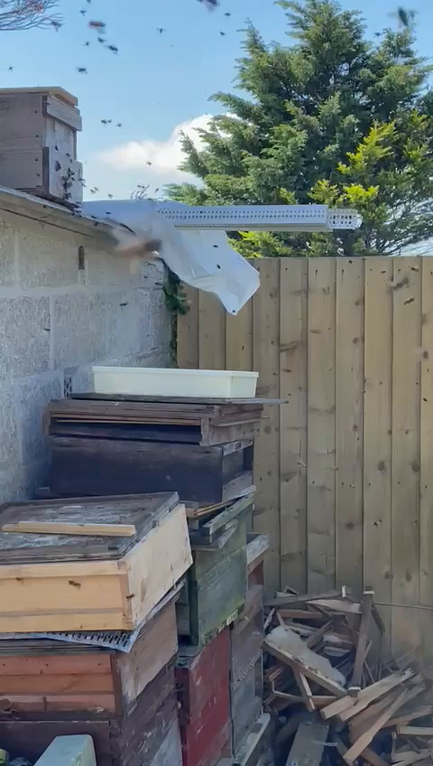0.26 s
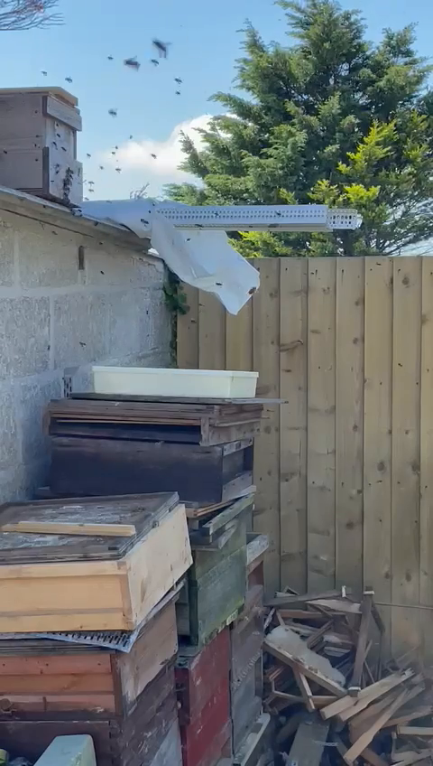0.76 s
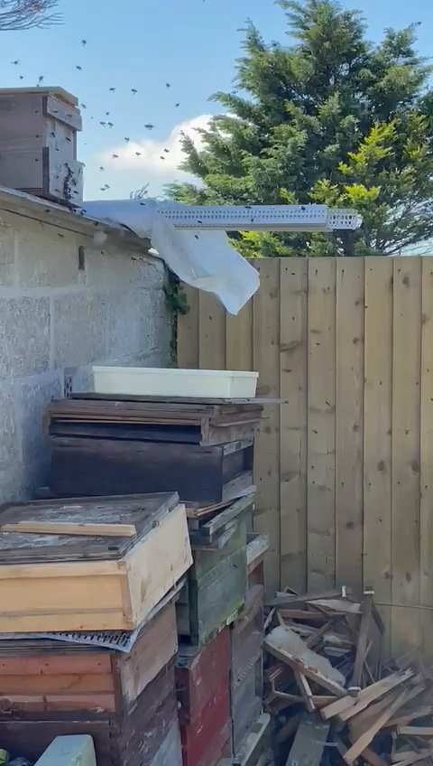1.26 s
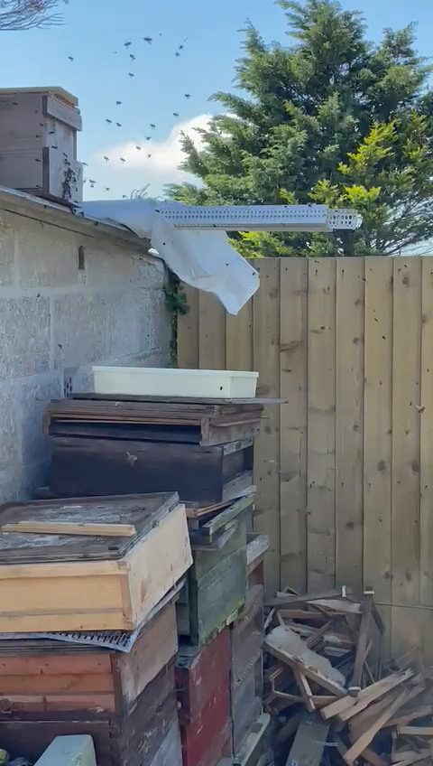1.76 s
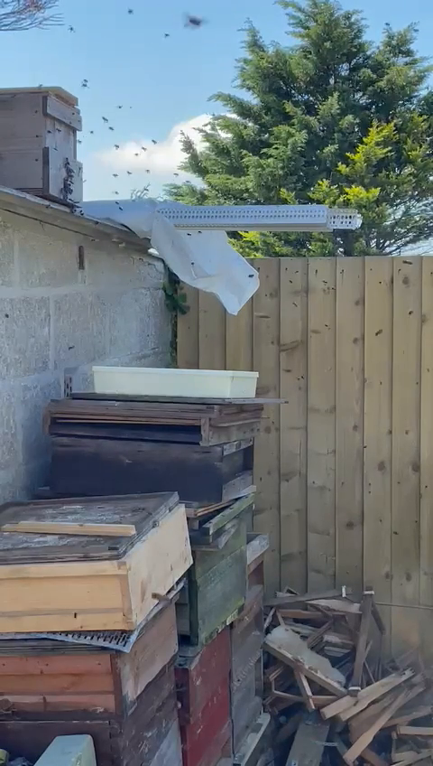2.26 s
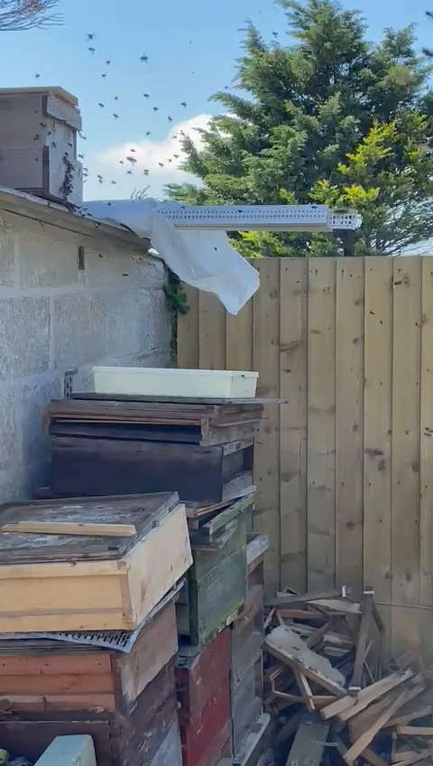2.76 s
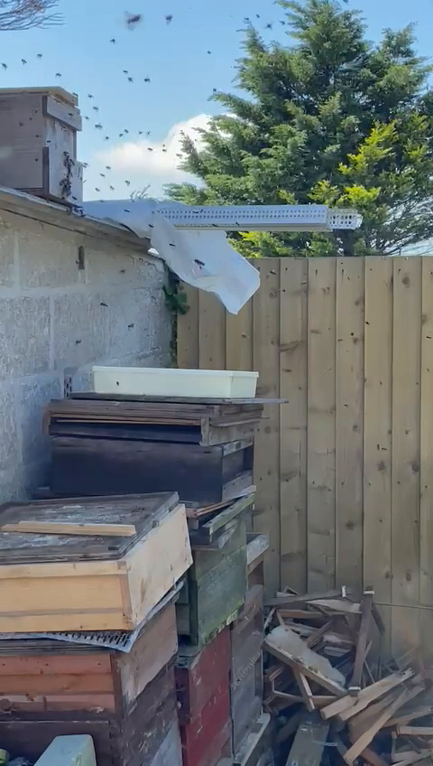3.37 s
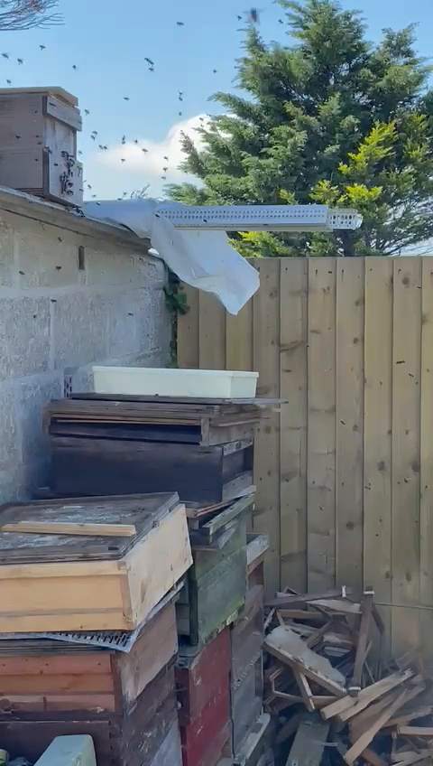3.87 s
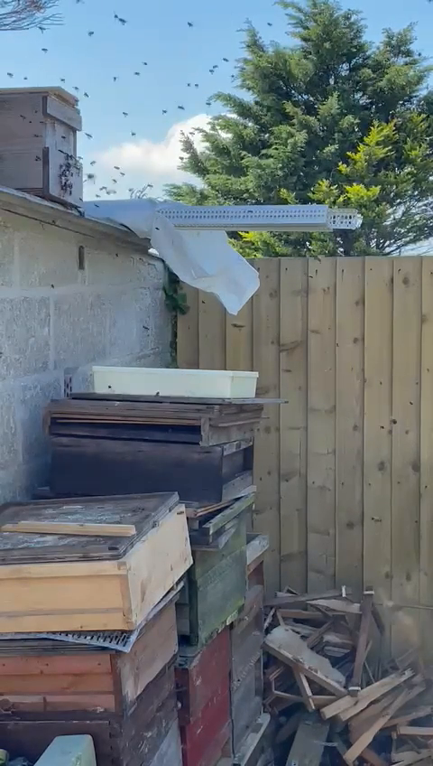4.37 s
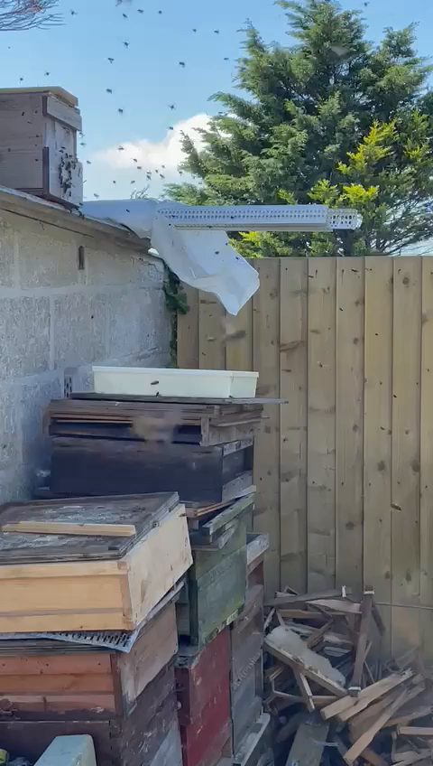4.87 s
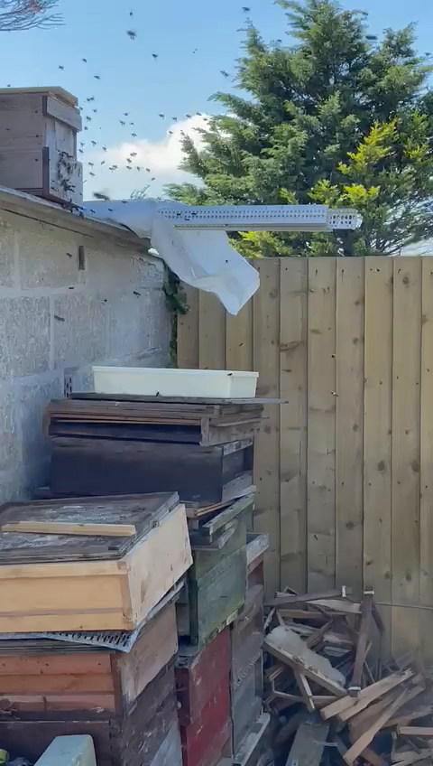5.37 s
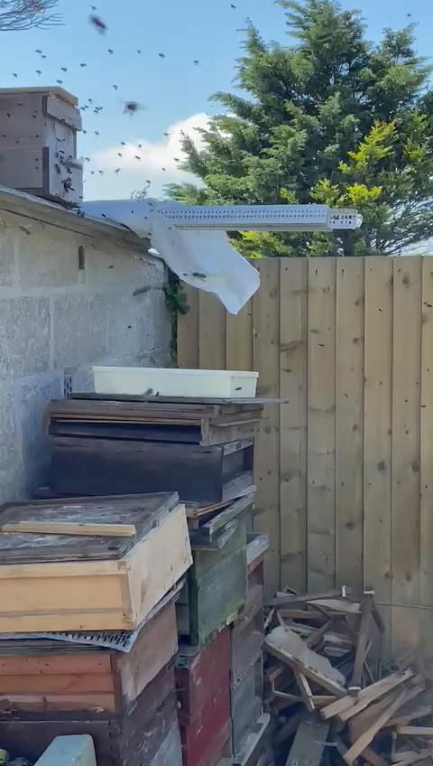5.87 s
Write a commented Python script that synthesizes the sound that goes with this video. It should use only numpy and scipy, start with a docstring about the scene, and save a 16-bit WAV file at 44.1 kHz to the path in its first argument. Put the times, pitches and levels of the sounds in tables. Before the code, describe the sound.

A dense swarm of bees hums steadily over backyard hives, single bees zipping close by, with faint sparrow chirps and low traffic rumble.

```python
"""A walled yard with hives, in stereo: a swarm of bees hangs over them, and single bees pass close by.
The swarm is many repeated wing strokes of slightly different, drifting pitch, with a wing hiss.
Further off a sparrow chirps three times, then gives one faint note: rattling whistles smeared by echoes.
Unseen traffic drones in the background: slowly gliding low tones over a rumble of shaped noise."""
import sys
import numpy as np
from scipy import signal
from scipy.fft import rfft, irfft, next_fast_len
from scipy.io import wavfile
from scipy.ndimage import uniform_filter1d

SR = 44100
rng = np.random.default_rng(int(sys.argv[2]) if len(sys.argv) > 2 else 0)


def transcribe(signal):
    """Save signal, clipped to [-1, 1], as a 16-bit WAV file at the path in sys.argv[1]."""
    frames = np.atleast_2d(signal).T
    limited = np.clip(frames, -1, 1)
    pcm = np.round(limited * 32767).astype(np.int16)
    wavfile.write(sys.argv[1], SR, pcm)


N = 269451  # length of the scene [samples]

# Loudness of the whole swarm in the middle, without its hiss: (time [s], level [dB])
SWARM_LEVEL = [(0, -44), (0.499, -45), (0.998, -45), (1.5, -44.5), (1.901, -45.5), (2.4, -44.5),
               (2.9, -44.5), (3.302, -44.5), (3.8, -44.5), (4.3, -44), (4.8, -44), (5.3, -44.5),
               (5.799, -44.5), (6.11, -44)]
# How pitch and nearness are shared out; slow and very fast beats are fainter and mostly duller:
# (share of bees below [0-1], pitch [Hz], relative level [dB], lift of overtones from the fourth up [dB])
BEE_PITCHES = [(0, 174.3, -8.5, -5), (.15, 202.4, -2.5, -3.5), (.3, 223.8, 1, -2), (.55, 241.4, 1.45, -0.3),
               (.75, 251.5, 1.5, 2), (.9, 259.6, -1.5, 0), (1.001, 277.3, -4, 0.5)]
# Relative strength of the tones in one wing beat: (overtone number [1 = the beat itself], level [dB])
WING_OVERTONES = [(1, 3), (2, 4.5), (3, -5.5), (4, -5.5), (5, -5), (6, -9), (8, -16.5), (11, -19.5),
                  (16, -21.5), (26, -26.5)]
# Colour of the wing hiss: (frequency [Hz], relative level per Hz [dB])
HISS_COLOUR = [(250, -25), (600, -11.5), (1200, -1.5), (2500, -14.5), (4500, -20), (6300, -23.5),
               (9000, -20), (10500, -18), (12000, -26)]
# Bees that pass close; a negative half fall is a rise: (time of the middle of the pass [s],
# half the crossing time [s], middle pitch [Hz], half the fall in pitch [Hz], peak level [dB],
# lift of overtones 5 to 7 [dB])
CLOSE_PASSES = [(0.2, .1, 249.6, 7.5, -55.5, -4), (0.82, .1, 237.6, 13.5, -47, 3),
                (0.98, .12, 246.4, 4, -49, 2), (1.1, .12, 247.4, 6.5, -47, -10),
                (1.399, .12, 232, 6, -50, 3), (1.5, .1, 244.5, 9, -56, 3), (2.2, .08, 244.7, 4, -56, -5),
                (2.4, .12, 247, -10, -54, 9), (2.701, .08, 238.5, 9, -45, -6),
                (2.8, .15, 233, 3, -52.5, -2), (3.279, .1, 243.5, 4.5, -53.5, -8),
                (3.51, .15, 252, 6, -49, -6), (4.189, .12, 239.2, 8, -49.5, 9),
                (4.4, .1, 249.4, 7.5, -44.5, 1), (4.572, .055, 255, 3.5, -47.5, 16.5),
                (4.661, .1, 244.2, 12.5, -47.5, -7), (4.92, .12, 226, 8, -41.5, 1.5),
                (5.0, 0.088, 206.9, 8, -50, -4), (5.21, .13, 261, -11, -44, 1),
                (6.009, .13, 246, 5.5, -48, 5)]
# Notes of the sparrow's three chirps and one faint far note: (time [s], length [s], first pitch [Hz],
# last pitch [Hz], level before the swell [dB], depth of the pitch rattle [Hz])
CHIRP_NOTES = [(2.232, 0.06, 5910, 6270, -64, 380), (2.266, 0.049, 4270, 4666, -50, 180),
               (2.277, 0.07, 3550, 3450, -58, 260), (2.306, 0.021, 4160, 4280, -50, 250),
               (2.32, 0.054, 3800, 3824, -47, 250), (2.345, 0.031, 4270, 4180, -53, 110),
               (2.356, 0.039, 3700, 3550, -60, 280), (3.362, 0.03, 3750, 3850, -59, 150),
               (3.373, .075, 4700, 4570, -53.5, 250), (3.374, 0.07, 5120, 5050, -60, 178),
               (3.43, 0.025, 4500, 4160, -52, 260), (3.437, 0.038, 3390, 3170, -56, 250),
               (3.463, 0.031, 3300, 3420, -57, 250), (4.215, 0.05, 5550, 5410, -59.5, 400),
               (4.242, .045, 4450, 4880, -53, 130), (4.24, .055, 3430, 3610, -59, 240),
               (4.243, .035, 4040, 4120, -55, 150), (4.265, 0.054, 4030, 4010, -46.5, 190),
               (4.297, 0.042, 3780, 3770, -47, 290), (4.327, 0.038, 3700, 3590, -59, 358),
               (4.367, 0.037, 3700, 3750, -65, 340), (4.765, 0.041, 5070, 5320, -67, 10)]
# The three strongest engine tones, one curve each: (time [s], pitch [Hz], level [dB])
STRONG_ENGINES = [
    [(0.0, 51.2, -44), (0.45, 50, -46.5), (0.6, 51.9, -27), (0.85, 51.7, -23), (0.94, 50.84, -21),
     (1.2, 50.5, -25.5), (1.5, 52.1, -26.5), (1.75, 49.27, -26.5), (2.05, 49.7, -33), (2.2, 47.5, -43),
     (2.35, 50.9, -46)],
    [(3.45, 51.7, -37), (3.62, 51.7, -34), (3.94, 51.5, -29.5), (4.21, 50.2, -32), (4.48, 51.1, -33.5),
     (4.76, 51.74, -37.5), (5.03, 51.83, -28.5), (5.3, 53.4, -31), (5.57, 55.1, -33.5), (5.84, 56.8, -31),
     (6.11, 57.3, -37)],
    [(3.15, 75.4, -51), (3.3, 74.4, -51), (3.47, 77.4, -35), (3.6, 78, -43), (3.72, 79.3, -41),
     (3.85, 74.53, -52), (3.98, 69.5, -38.5), (4.15, 59.57, -39), (4.35, 55.16, -31), (4.61, 57.3, -37),
     (4.86, 55.67, -40), (5.11, 57.82, -40.5), (5.36, 59.2, -30.5), (5.61, 59.8, -33), (6.11, 63.2, -56)],
]
# Weaker engine tones that swell and dip, one curve each: (time [s], pitch [Hz], level [dB])
WEAK_ENGINES = [
    [(0.0, 65.6, -39.5), (0.19, 67.9, -41.5), (0.38, 66.7, -36), (0.56, 66.6, -38), (0.75, 67, -39),
     (0.94, 67.8, -46), (1.12, 67.2, -47), (1.31, 66.6, -43.1), (1.5, 65.6, -51.4)],
    [(0.0, 87, -53.0), (0.2, 88.3, -48.8), (0.39, 88.9, -51), (0.58, 88.2, -46.5), (0.78, 87.2, -48.5),
     (0.98, 88.1, -42), (1.17, 86.6, -52), (1.36, 88.2, -44), (1.56, 85.7, -52), (1.76, 87.2, -51),
     (1.95, 87.5, -54)],
    [(0.7, 95, -59), (0.91, 97.0, -55.5), (1.12, 98.0, -58), (1.34, 99.4, -53), (1.55, 99.9, -61.4)],
    [(1.6, 68.8, -51.1), (1.79, 70.1, -39.5), (1.99, 69.2, -40.5), (2.18, 70.8, -42.5), (2.37, 70.4, -49),
     (2.56, 72.4, -48.9), (2.76, 70.4, -52), (2.95, 74.37, -60)],
    [(1.95, 61.1, -55), (2.14, 59.9, -47), (2.34, 60.5, -42), (2.53, 60.5, -39.5), (2.73, 60.7, -41),
     (2.92, 60.2, -41.5), (3.12, 60.3, -43.5), (3.31, 61.4, -39), (3.51, 60, -39), (3.7, 60.5, -52.6)],
    [(1.9, 81.6, -57), (2.1, 81.6, -52), (2.3, 81.08, -44), (2.5, 80.7, -47.5), (2.7, 80.2, -45),
     (2.9, 81.1, -46.3), (3.1, 79.6, -47), (3.3, 78.2, -49)],
    [(2.1, 42.4, -56.3), (2.29, 41.8, -54.2), (2.48, 39.5, -61), (2.66, 39.7, -52), (2.85, 41, -50),
     (3.04, 40.4, -52), (3.22, 41, -52), (3.41, 40.46, -51), (3.6, 41.1, -53.6)],
    [(2.3, 50.7, -52), (2.49, 50.5, -46.2), (2.68, 49.2, -51), (2.88, 49.74, -50), (3.07, 50.3, -48),
     (3.26, 50.34, -51), (3.45, 51.25, -47)],
    [(2.45, 96, -55), (2.65, 97, -52.7), (2.85, 99, -49), (3.05, 100.8, -59.2), (3.25, 102, -58.5),
     (3.45, 102.5, -65)],
    [(3.65, 87.6, -53.7), (3.84, 88.5, -46), (4.04, 88, -45), (4.23, 88.2, -46), (4.43, 87.9, -47),
     (4.62, 87, -49), (4.82, 86.4, -43.5), (5.01, 86.9, -46), (5.21, 85.9, -48), (5.4, 85.5, -51)],
    [(5.4, 87.6, -55), (5.63, 87.4, -55.8), (5.87, 91, -47), (6.11, 89.4, -51)],
    [(3.8, 97.9, -52), (4.0, 98.5, -53), (4.2, 101.5, -54.0), (4.4, 101.2, -65)],
    [(3.6, 65.3, -51.6), (3.79, 68.3, -49), (3.97, 69, -47), (4.16, 67.8, -59), (4.34, 68, -55),
     (4.53, 68, -45), (4.71, 66.8, -48.2), (4.9, 66.0, -51.5)],
    [(4.9, 71.5, -48), (5.1, 69.7, -53), (5.3, 69.93, -42), (5.5, 70, -53)],
    [(4.0, 111, -62), (4.21, 114, -62.8), (4.42, 112, -57.1), (4.63, 113, -68), (4.84, 115.4, -54.5),
     (5.05, 115.1, -57), (5.26, 117.5, -53), (5.47, 119.4, -53.5), (5.68, 120.7, -58), (5.89, 121.6, -56.2),
     (6.11, 123.7, -56)],
    [(4.9, 106.6, -63), (5.1, 107.2, -62), (5.3, 107, -53), (5.5, 109.3, -68)],
    [(5.3, 80.9, -61), (5.5, 79.9, -51), (5.7, 81.93, -52.8), (5.9, 81.7, -45), (6.11, 85, -49.1)],
    [(5.75, 71.6, -55.0), (5.92, 70.6, -54), (6.11, 71.8, -40)],
    [(5.3, 43.0, -55.7), (5.5, 42.61, -59.2), (5.7, 41, -59), (5.9, 41.5, -53.5), (6.11, 40.3, -58.3)],
]
# Colour of the traffic rumble: (frequency [Hz], relative level per Hz [dB])
RUMBLE_COLOUR = [(20, -13.5), (33, -5.5), (50, -6.5), (75, 1.5), (100, -2.5), (130, -10.5), (170, -11.5),
                 (330, -18.5), (700, -48)]
# Colour of the sum of the channels, near silent in a stretch of the treble: (frequency [Hz], gain [dB])
MIDDLE_COLOUR = [(20, -1.5), (6300, -0.5), (6800, -15), (7050, -46), (8300, -51.5), (8500, -19.5),
                 (9200, -2.5), (12000, -1.5)]
# Colour of the difference of the channels, which keeps the bass mono: (frequency [Hz], gain [dB])
ACROSS_COLOUR = [(90, -71), (140, -28), (220, -24), (460, -11.5), (700, -8), (1500, -8), (2800, -9),
                 (3600, -19.5), (4400, -9.5), (5100, -30), (5400, -47), (5700, -12.5), (6100, 2), (8900, 3),
                 (9800, -11.5), (10300, -25.5), (11200, -33.5), (11600, -50.5)]

DRIFT_HZ = 6.0  # drift of each bee's pitch, rms over the swarm
NEAR_SPREAD_DB = 3.5  # drift of each bee's level, rms over the swarm
HISS_DB, RUMBLE_DB = -55.5, -49  # rms levels before the channel colours
CLOSE_BASS_DB = 11  # near a wing the lowest tone of the beat is stronger
RATTLE_HZ = 341.4  # mean rate of the sparrow's rattle
WOBBLE_HZ = 65  # chance wobble of a note's pitch, rms
RASP = 0.55  # largest share of breathy noise that spreads a note
ECHO_S = 0.27  # time for the echoes to fall by 60 dB
EDGE_HZ = 11950  # upper band limit of the recorder


def swarm(count=58):
    """Each bee repeats its stroke; pitch drifts with effort and motion, level with distance."""
    share, hz, db, treble_db = np.transpose(BEE_PITCHES)
    rank = (np.arange(count)[:, None] + rng.random((count, 1))) / count
    pitch = np.interp(rank, share, hz) + DRIFT_HZ * wander(top_hz=7, count=count)
    near_db = np.interp(rank, share, db) + NEAR_SPREAD_DB * wander(top_hz=8, count=count)
    near = gain_of(near_db)
    position = wander(top_hz=1.583, count=count)  # sideways place of each bee
    bee_treble_db = np.interp(rank, share, treble_db)[:, None]
    wings = stroke(count=count, treble_db=bee_treble_db)

    at = np.arange(N) * 200 / SR  # place of each sample on the slow curves
    grid = np.arange(pitch.shape[1])
    crowd = np.zeros((2, N))  # middle and across
    for b in range(count):
        bee = beat(wings[b], np.interp(at, grid, pitch[b]))
        bee = bee * np.interp(at, grid, near[b])
        crowd += [bee, bee * np.interp(at, grid, position[b])]

    # the crowd keeps its summed loudness while single bees come and go within it
    loudness = uniform_filter1d(crowd[0] ** 2, SR // 3) ** .5
    level = gain_of(np.interp(np.arange(N) / SR, *np.transpose(SWARM_LEVEL)))
    hiss = gain_of(HISS_DB) * evened(coloured(rng.standard_normal((2, N)), HISS_COLOUR))
    return level * crowd / loudness + hiss


def stroke(count, bass_db=0, lift_db=0, treble_db=0):
    """One wing stroke a row, 1024 points: a sum of 26 overtones, each with its own chance phase."""
    number, db = np.transpose(WING_OVERTONES)
    k = np.arange(1, 27)[:, None]
    turn = np.arange(1024) / 1024
    height_db = np.interp(np.log(k), np.log(number), db)
    height_db = height_db + bass_db * (k == 1) + lift_db * ((k > 4) & (k < 8)) + treble_db * (k > 3)
    phase = rng.random((count, len(k), 1))
    overtones = gain_of(height_db) * np.sin(2 * np.pi * (k * turn + phase))
    return evened(overtones.sum(1))


def beat(wing, hz):
    """Repeats one stroke at a moving pitch, as a wing does."""
    turns = np.cumsum(hz) / SR
    return wing[(turns * len(wing)).astype(int) % len(wing)]


def passes():
    """A single bee swells and fades as it crosses from one side to the other, its pitch sliding."""
    out = np.zeros((2, N))
    for s, half, hz, half_fall_hz, db, lift_db in CLOSE_PASSES:
        u = np.linspace(-1, 1, round(2 * half * SR))  # -1 to 1 along the crossing
        wing = stroke(1, CLOSE_BASS_DB, lift_db)[0]
        swell = np.cos(np.pi * u / 2) ** 2
        bee = gain_of(db) * swell * beat(wing, hz - half_fall_hz * u)
        direction = rng.choice([-1, 1])
        add(out, s - half, np.array([bee, direction * 1.1 * u * bee]))
    return out


def sparrow():
    """Whistled notes chopped by an uneven rattle in level and pitch, smeared by echoes off walls and trees."""
    dry = np.zeros(N)
    for s, length, first_hz, last_hz, db, depth_hz in CHIRP_NOTES:
        hz = np.linspace(first_hz, last_hz, round(length * SR))
        uneven, lumpy = (evened(uniform_filter1d(rng.standard_normal(len(hz)), 120)) for _ in range(2))
        rattle = 2 * np.pi * np.cumsum(RATTLE_HZ * (1 + 0.15 * uneven)) / SR
        moving_hz = hz + WOBBLE_HZ * uneven + depth_hz * np.sin(rattle)
        tone = np.sin(2 * np.pi * np.cumsum(moving_hz) / SR)
        tone *= (1 + 0.34 * np.cos(rattle)) * gain_of(1.6 * lumpy)
        breath = evened(np.convolve(rng.standard_normal(len(hz)), np.hanning(100), "same"))
        rasp = RASP * min(depth_hz / RATTLE_HZ, 1) ** .5  # deeper rattles are raspier
        tone *= 1 + rasp * breath
        u = np.linspace(0, 1, len(hz))
        swell = np.sin(np.pi * u ** 1.2) ** 0.8  # grows slowly, stops short
        add(dry, s, gain_of(db) * evened(tone) * swell)

    t = np.arange(SR // 2) / SR
    echoes = rng.standard_normal((2, len(t))) * gain_of(-60 * t / ECHO_S)
    echoes = echoes / np.linalg.norm(echoes[0])
    wet = signal.fftconvolve(dry[None], echoes, axes=1)[:, :N]
    middle = dry + gain_of(-5.5) * wet[0]
    return np.array([middle, gain_of(5.5) * wet[1]])  # only echoes reach the across signal


def traffic():
    """Gliding engine tones that beat against each other, over a low rumble."""
    out = gain_of(RUMBLE_DB) * evened(coloured(rng.standard_normal(N), RUMBLE_COLOUR))
    for rows in STRONG_ENGINES + WEAK_ENGINES:
        s, (hz, db) = unroll(rows)
        t = s + np.arange(len(hz)) / SR
        # fades of 0.1 s, except where a tone runs over the start or end of the scene
        rise = np.minimum((t - s) / .1, 1) if s > .05 else 1
        fall = np.minimum((t[-1] - t) / .1, 1) if t[-1] < 6 else 1
        tone = np.sqrt(2) * np.cos(2 * np.pi * np.cumsum(hz) / SR)  # rms 1
        add(out, s, gain_of(db) * rise * fall * tone)
    return out


def gain_of(db):
    """Amplitude factor of a level in dB."""
    return 10 ** (np.asarray(db) / 20)


def evened(x):
    """Scales the whole array to rms 1."""
    return x / np.sqrt(np.mean(x ** 2) + 1e-20)


def add(mix, s, sound):
    """Lays a sound into the mix from time s [s], cut at the end of the mix."""
    part = mix[..., round(s * SR):][..., :sound.shape[-1]]
    part += sound[..., :part.shape[-1]]


def coloured(x, points):
    """Shapes the spectrum by (Hz, dB) points joined on a log axis; mirrored ends keep the edges smooth."""
    f, db = np.transpose(points)
    size = next_fast_len(N + 8192)
    wide = np.pad(x, [(0, 0)] * (x.ndim - 1) + [(4096, size - N - 4096)], "reflect")
    hz = np.fft.rfftfreq(size, 1 / SR)
    gain = gain_of(np.interp(np.log(hz + 1), np.log(f + 1), db))
    return irfft(rfft(wide) * gain, size)[..., 4096:4096 + N]


def wander(top_hz, count):
    """Slow chance curves of joint rms 1, one a row, 200 points a second: sines of weight 1/sqrt(Hz)."""
    t = np.arange(N * 200 // SR + 2) / 200
    hz = np.geomspace(.2, top_hz, 16)[:, None]
    phase = rng.random((count, len(hz), 1))
    waves = np.sin(2 * np.pi * (hz * t + phase)) / np.sqrt(hz)
    return evened(waves.sum(1))


def unroll(rows):
    """Start time, and the columns of a table at every sample."""
    s, *columns = np.transpose(rows)
    t = np.arange(s[0], s[-1], 1 / SR)
    return s[0], [np.interp(t, s, c) for c in columns]


def scene():
    """Sums the sources as middle and across signals, then turns these into left and right."""
    middle, across = swarm() + passes() + sparrow()
    middle = coloured(middle + traffic(), MIDDLE_COLOUR)
    across = coloured(across, ACROSS_COLOUR)
    return np.array([middle + across, middle - across])


def record(dry):
    """The band limit of the recorder: a steep lowpass on both channels."""
    padded = np.pad(dry, ((0, 0), (255, 255)), "reflect")
    lowpass = signal.firwin(511, EDGE_HZ, window=("kaiser", 9), fs=SR)
    return signal.oaconvolve(padded, lowpass[None], "valid")


dry = scene()
out = record(dry)
transcribe(out)
```